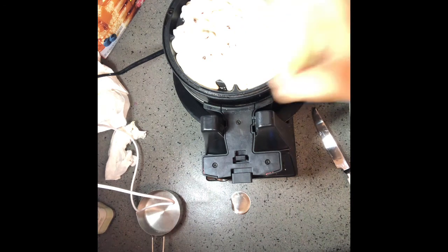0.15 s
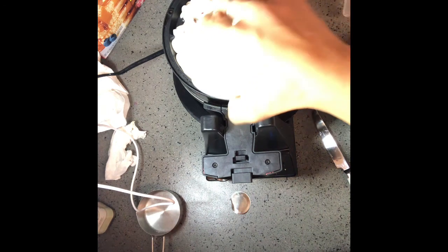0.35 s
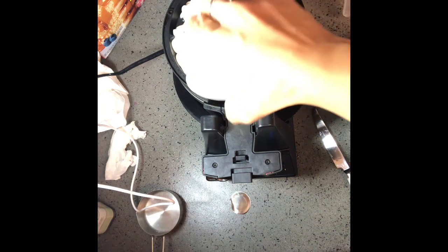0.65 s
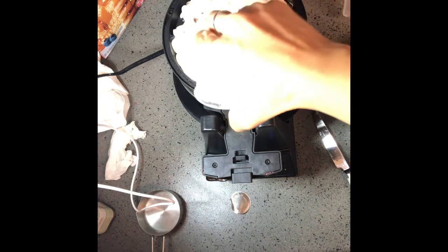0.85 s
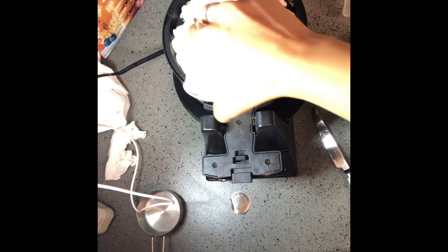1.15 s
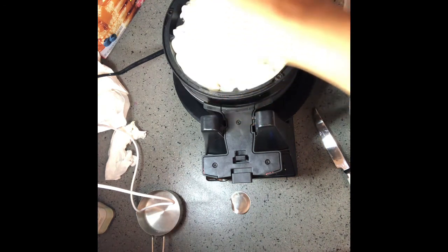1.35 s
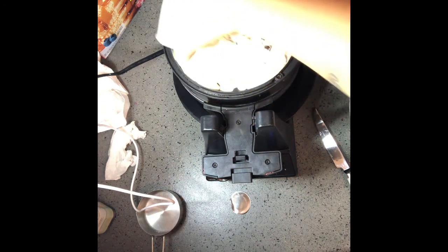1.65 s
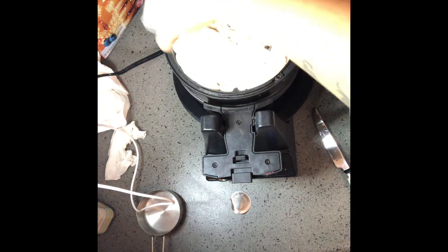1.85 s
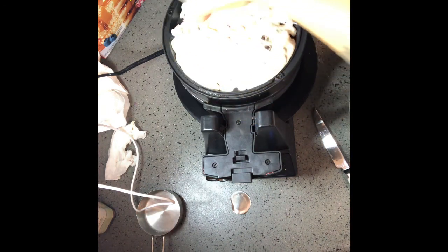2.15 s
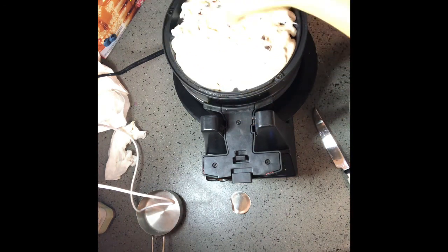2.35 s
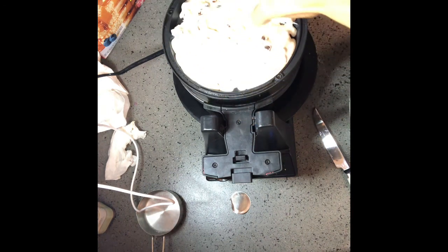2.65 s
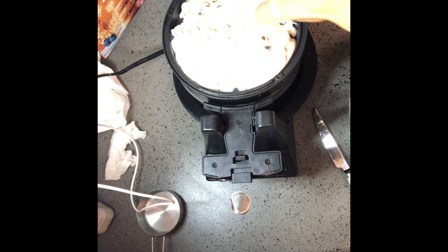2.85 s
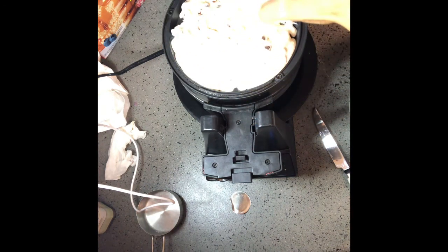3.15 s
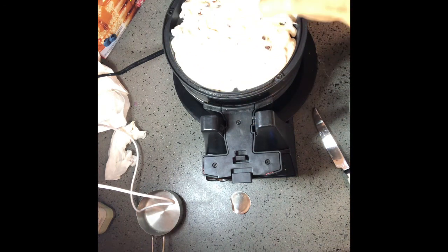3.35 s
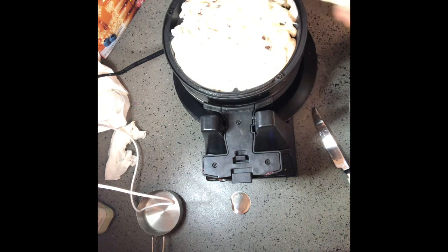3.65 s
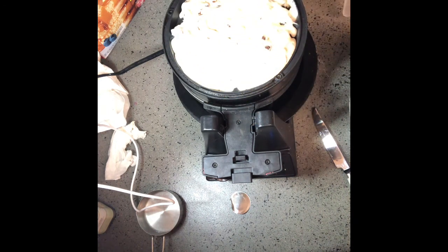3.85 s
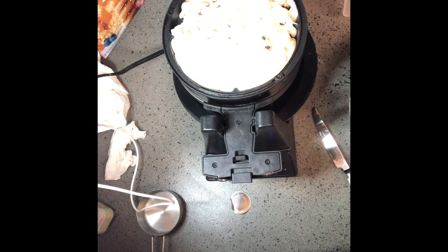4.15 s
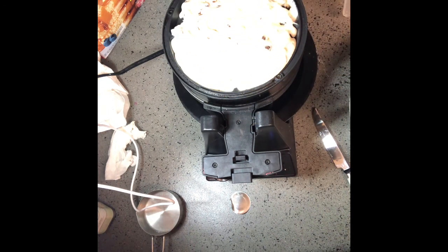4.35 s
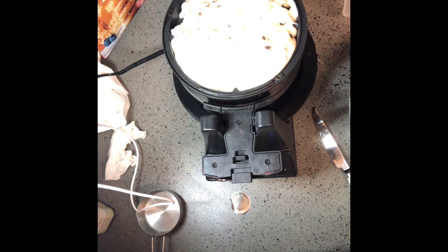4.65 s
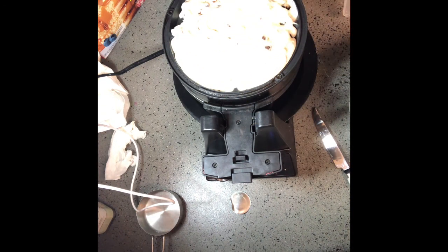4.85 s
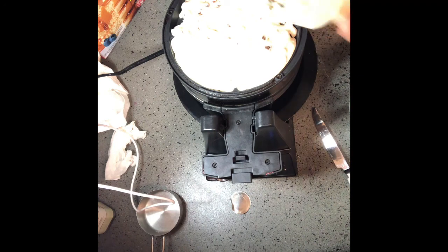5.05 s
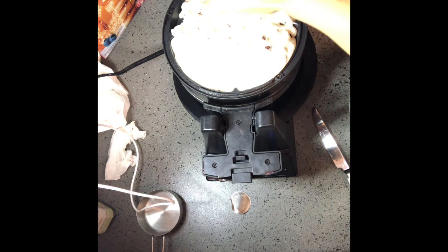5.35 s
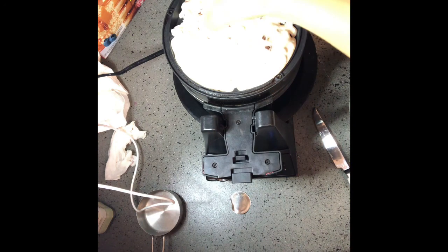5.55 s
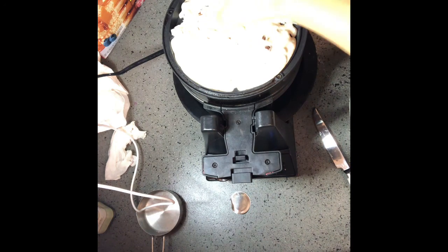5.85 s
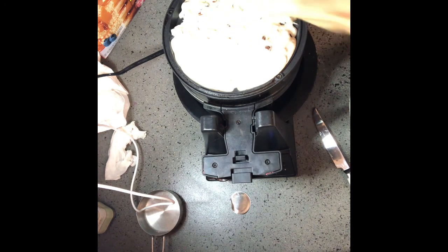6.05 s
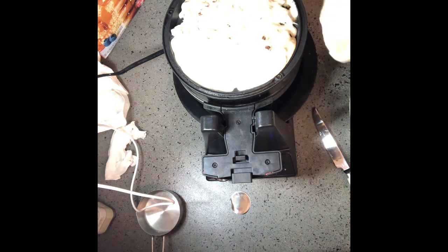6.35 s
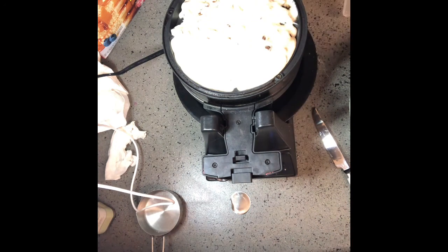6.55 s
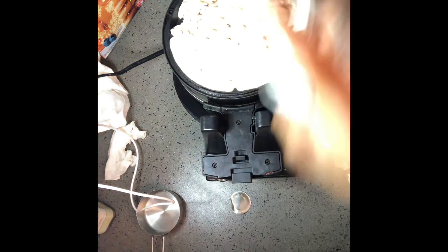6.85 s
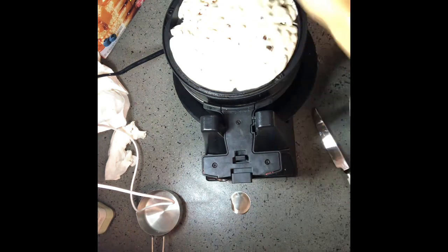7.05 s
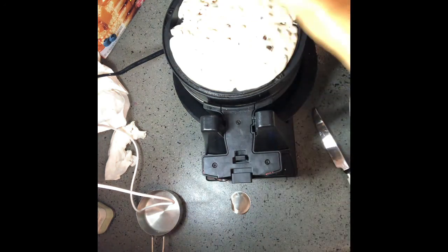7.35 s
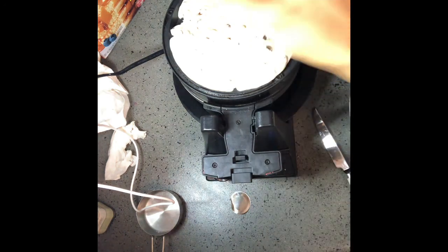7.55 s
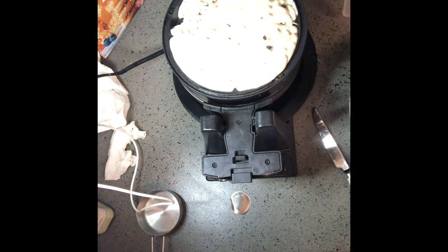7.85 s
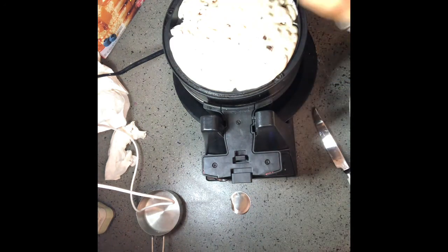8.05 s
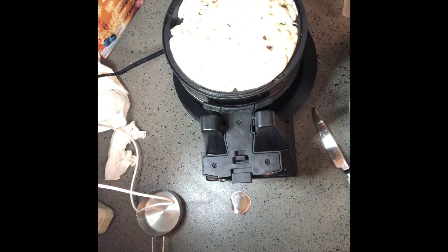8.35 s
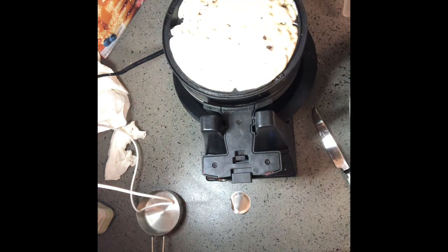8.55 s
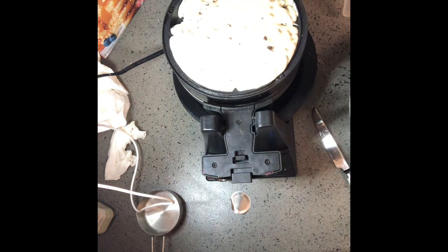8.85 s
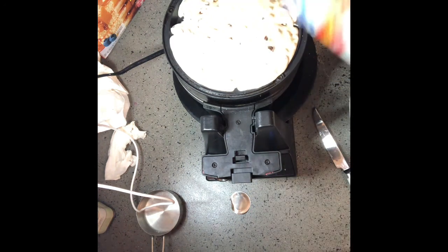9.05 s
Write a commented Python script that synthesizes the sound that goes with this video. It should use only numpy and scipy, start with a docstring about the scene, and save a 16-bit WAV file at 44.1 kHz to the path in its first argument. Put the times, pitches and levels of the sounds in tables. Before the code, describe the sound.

A faint steady sizzle and low room hum lie under close, dry kitchen handling. Light ticks, brushes and bumps of a heavy iron lead to six evenly spaced rim knocks, by far the loudest sounds. Short squeaks and a clack follow, then soft brushing, fat pops and a sharp fluttering spray. The can lands with a small knock, wobbles and scrapes along the counter.

```python
"""A cook works at a filled waffle maker on a kitchen counter, close to the microphone, over sizzle and hum.
Pressing the filling rocks the iron amid light taps and brushing; then six knocks land on its rim.
Short squeaking drags and a clack on a tin follow; a can is picked up, sprays for about a second, is set
down and is pushed along the counter. Struck things are resonant bodies excited by contact spectra;
rubbed ones are shaken by random slips; spray, brushing and sizzle are shaped noise."""
import sys
import numpy as np
from scipy import signal
from scipy.fft import rfft, irfft, next_fast_len
from scipy.io import wavfile
from scipy.ndimage import map_coordinates

SR = 44100
rng = np.random.default_rng(int(sys.argv[2]) if len(sys.argv) > 2 else 0)


def to_wav(s):
    """Save 16-bit WAV."""
    ch = np.atleast_2d(s).T  # columns
    pcm = np.round(np.clip(ch, -1, 1) * 32767)  # PCM
    wavfile.write(sys.argv[1], SR, pcm.astype(np.int16))


N = 405719
TIME = np.arange(N) / SR
HIT_SIZE = 8192  # samples in the spectrum of one blow
HIT_HZ = np.fft.rfftfreq(HIT_SIZE, 1 / SR)


def undb(db):
    """Logarithmic level: decibels to amplitude gain."""
    return 10 ** (np.asarray(db) / 20)


def unit(x):
    """Mean power: scale to rms 1."""
    return x / np.sqrt(np.mean(x ** 2))


def add(out, s, x):
    """Superposition: mix x into out, starting at s seconds."""
    start = max(int(s * SR), 0)
    out[start:start + len(x)] += x[:N - start]


def contour(hz, points):
    """Spectral envelope: gain at each frequency from (frequency [Hz], level [dB]) points."""
    at, db = np.transpose(points)
    return undb(np.interp(np.log(hz + 1), np.log(at), db))


def coloured(x, points):
    """Linear filtering: x shaped by a spectral envelope, at rms 1."""
    size = next_fast_len(N)
    gain = contour(np.fft.rfftfreq(size, 1 / SR), points)
    return unit(irfft(rfft(x, size) * gain, size)[:N])


def resonances(peaks):
    """Resonance: the summed power of steep-sided modes gives the gain of a body."""
    power = sum(undb(db) ** 2 / (1 + (2 * (HIT_HZ - hz) / width) ** 2) ** 3 for hz, width, db in peaks)
    return np.sqrt(power + 1e-9)


def causal(gain):
    """Minimum phase: the spectrum of the promptest impulse response that has this gain."""
    cepstrum = irfft(np.log(gain))
    cepstrum[1:HIT_SIZE // 2] *= 2
    cepstrum[HIT_SIZE // 2 + 1:] = 0
    return np.exp(rfft(cepstrum))


def walk(rate):
    """Random modulation: normal draws, rate a second, joined by straight lines."""
    steps = rng.standard_normal(N // 100)
    return np.interp(TIME * rate, np.arange(len(steps)), steps)


def grains(rate, spread_db):
    """Shot noise: random clicks of uneven size and sign, rate a second, at rms 1."""
    sizes = undb(spread_db * np.minimum(rng.exponential(size=N), 3))
    return unit((rng.random(N) < rate / SR) * sizes * rng.choice([-1, 1], N))


def gate(start, end, attack_s, release_s):
    """Amplitude envelope: straight attack, hold until end, exponential release."""
    return np.clip((TIME - start) / attack_s, 0, 1) * np.exp(-np.maximum(TIME - end, 0) / release_s)


def strokes(rows, release_s, lag_s=0):
    """Amplitude envelope of a few movements that build, hold and let go."""
    return sum(undb(db) * gate(start + lag_s, end + lag_s, build_s, release_s)
               for start, end, build_s, db in rows)


def blows(events, peaks, travel_s, chatter_s, gain_db, weight_db, hardness_db):
    """Impact excitation: a heavy blow brings out a body's bass, a hard one its treble."""
    out = np.zeros(N)
    # bending waves travel as the root of frequency, so the treble arrives first; travel_s holds near 1 kHz
    bending = np.exp(-4j * np.pi * travel_s * np.sqrt(1000 * (HIT_HZ + 50)))
    treble = 1 / (1 + (1700 / (HIT_HZ + 1)) ** 6)
    middle = (HIT_HZ > 500) & (HIT_HZ < 1500)
    for s, peak_db, thud_db, edge_db, *_ in events:
        # each blow lands on another spot and weights the resonances a little differently
        body = resonances([(hz, width, db + rng.standard_normal()) for hz, width, db in peaks])
        bands = [(80, 450), (500, 1500), (2000, 7000)]
        low, mid, high = (10 * np.log10(np.sum(body[(HIT_HZ > a) & (HIT_HZ < b)] ** 2)) for a, b in bands)
        bass_db = thud_db + weight_db + mid - low
        treble_db = edge_db + hardness_db + mid - high
        contact = contour(HIT_HZ, [(400, bass_db), (560, 0.11), (1500, 0.83), (2400, treble_db)])
        # rough surfaces chatter for a moment as they meet, which smears the treble
        chatter = rng.standard_normal(HIT_SIZE) * np.exp(-TIME[:HIT_SIZE] / chatter_s)
        smear = 1 - treble + treble * rfft(chatter) / np.linalg.norm(chatter)
        spectrum = causal(body * contact) * bending * smear
        mid_peak = np.abs(irfft(spectrum * middle)).max()
        add(out, s, irfft(spectrum)[:HIT_SIZE // 2] * undb(peak_db + gain_db) / mid_peak)
    return out


def friction(effort, peaks, slip_rate, spread_db, patchy_db):
    """Frictional excitation: uneven slips shake a resonant body."""
    body = irfft(causal(resonances(peaks)))
    slips = grains(slip_rate, spread_db) * undb(patchy_db * walk(45))
    return unit(signal.fftconvolve(slips, body)[:N]) * effort


# room noise of the kitchen: (frequency [Hz], relative level per Hz [dB])
AIR_COLOUR = [(15, -61.5), (25, -38), (64, -3.5), (124, -6.5), (182, -9.5), (243, -7), (371, -11),
              (409, -10.5), (612, -12.5), (662, -12), (2500, -30), (3250, -48.5), (5500, -120)]
# low steady hum of the kitchen: (frequency [Hz], rms level before wavering [dB])
HUM = [(79, -80), (120, -75.5), (240, -82)]


def kitchen():
    """Stationary noise: low room noise and a hum of sines wavering in level and phase."""
    hum = np.zeros(N)
    for hz, db in HUM:
        level = undb(db + 1.5 * walk(3)) * np.sqrt(2)
        hum += level * np.sin(2 * np.pi * hz * TIME + .5 * walk(3.707))
    return hum + coloured(rng.standard_normal(N), AIR_COLOUR) * undb(-68.94 + 0.61 * walk(3.6))


# bands of the room's echo: (centre frequency [Hz], level [dB], time to fade by 60 dB [s])
ECHO_BANDS = [(127.8, -3, 0.73), (352.2, -1.5, 0.18), (717, -14, 0.26), (1206.5, -12, 0.3),
              (2500, -13.5, 0.14), (5506, -12, 0.36), (14120, -9, 0.14)]


def room(x, first_echo_s):
    """Reverberation: dense echoes from counter and walls, each band fading at its own pace."""
    t = TIME[:SR]
    hz, noise, tail = np.fft.rfftfreq(SR, 1 / SR), rfft(rng.standard_normal(SR)), 0
    centres = np.log(np.array(ECHO_BANDS)[:, 0])
    for share, (_, db, t60) in zip(np.eye(len(ECHO_BANDS)), ECHO_BANDS):
        band = irfft(noise * np.interp(np.log(hz + 1), centres, share), SR)
        fade = undb(-60 * t / t60) * np.clip(t / first_echo_s - 1, 0, 1)
        tail = tail + undb(db) * band * fade / np.sqrt(np.sum(fade ** 2))
    return signal.fftconvolve(x, tail)[:N]


# harder sizzling about the pressing, knocks and spray:
# (start [s], time to build [s], time constant of dying down [s], level [dB])
FLARES = [(0, 1.274, 1.1, -76), (2.4, .4, .3, -65.5), (7.2, .8, 0.7, -60.5)]


def sizzle_level():
    """Amplitude envelope: a steady simmer, with flares that build and die down."""
    flares = sum(undb(db) * gate(s, s + build_s, build_s, fade_s) for s, build_s, fade_s, db in FLARES)
    return undb(-73.5) + flares


# spectra of the hiss and of the crackle: (frequency [Hz], relative level per Hz [dB])
HISS_COLOUR = [(710, -29.5), (1200, -1.5), (1510, -8.5), (2200, -4.5), (4770, -5), (7270, -6.5),
               (8730, -11.5), (15100, -11), (15800, -13.5)]
CRACKLE_COLOUR = [(1000, -22), (3500, -0.5), (7500, -1), (15000, -4)]


def sizzle():
    """Bubble noise: tiny steam bubbles burst in a smooth hiss; larger ones crackle singly."""
    hiss = coloured(rng.standard_normal(N), HISS_COLOUR) * undb(0.606 * walk(9.1))
    burst = rng.standard_normal(HIT_SIZE) * np.exp(-TIME[:HIT_SIZE] / .0015)
    crackle = coloured(signal.fftconvolve(grains(45, 3.49), burst)[:N], CRACKLE_COLOUR)
    return (undb(-1.5) * hiss + undb(-7.5) * crackle) * sizzle_level()


# single pops of hot fat: (time [s], level before a common 12 dB cut [dB])
FAT_POPS = [(3.692, -39.5), (4.713, -44.5), (6.94, -33), (7.132, -39.5), (8.237, -35), (8.645, -45)]


def pops():
    """Impulsive noise: fat droplets burst as decaying noise, differenced to sound thin and bright."""
    out = np.zeros(N)
    for s, db in FAT_POPS:
        snap = np.diff(rng.standard_normal(HIT_SIZE + 1)) * np.exp(-TIME[:HIT_SIZE] / 0.0025)
        add(out, s, undb(db - 12.0) * snap)
    return out


# hands brush the filling, the iron and the can:
# (time of peak [s], time constant of swell and fade [s], level [dB])
RUBS = [(.1, 0.039, -65.5), (0.287, .0087, -54.5), (1.201, 0.02, -60), (1.52, 0.039, -65.5),
        (1.96, 0.11, -69), (5.03, 0.12, -70), (6.497, 0.035, -50.5), (6.916, 0.029, -53.5)]
# spectrum of the swishes: (frequency [Hz], relative level per Hz [dB])
BRUSH_COLOUR = [(290, -33), (500, -11), (841, -17.5), (1610, -3.5), (1920, -13.5), (2630, -6), (8990, -18),
                (12400, -24.5), (15800, -29)]


def brush():
    """Sliding-contact noise: skin and utensil pass over things in soft, grainy swishes."""
    # the utensil scuffs the rim 42 ms after the second, third and fourth knocks
    scuffs = [(s + .042, 0.017, -55) for s, *_ in RIM_KNOCKS[1:4]]
    pressure = sum(undb(db) * np.exp(-np.abs(TIME - s) / length) for s, length, db in RUBS + scuffs)
    swish = coloured(rng.standard_normal(N) + 0.92 * grains(700, 2.4), BRUSH_COLOUR)
    return swish * pressure * undb(-0.5 + 2.2 * walk(70))


def rebounds(events, count, rebound_s=.013, rebound_db=-6.5):
    """Energy loss at impact: each tap repeats at uneven gaps, weaker each time."""
    rows = []
    for s, peak_db, thud_db, edge_db in events:
        for k, spread in enumerate(rng.uniform(.5, 1.5, count)):
            rows.append((s, peak_db + k * rebound_db, thud_db, edge_db))
            s = s + rebound_s * spread
    return rows


# In every table of blows: level is the mid-band peak before gain_db; thud and edge are relative to the
# mid band, before weight_db and hardness_db.
# light taps of fingers and utensil: (time [s], level [dB], thud [dB], edge [dB])
LIGHT_TAPS = [(.266, -46, -10, -32), (.413, -37, -20, -16), (.565, -50, -19.5, -12),
              (1.004, -37.5, -16, -13), (1.173, -42.5, -8, -7), (1.485, -49.5, -5.5, -8),
              (1.631, -42, -24.5, -8.5), (1.649, -47.5, -7, -30), (1.789, -47, -9, -17),
              (6.48, -45.5, -11, -3.5), (6.819, -50.5, -27, 4), (7.123, -60, -26, 13.5),
              (7.85, -29, -16, 7), (7.88, -37, -22, -17)]
# resonances of the utensil: (frequency [Hz], width [Hz], level [dB])
UTENSIL = [(356, 170, -25), (845, 130, -9), (1106, 150, 5.5), (1570, 87, 6), (2210, 960, 8.5),
           (3560, 5200, 5), (6200, 4500, -3.5), (12100, 4300, -7.5)]


def taps():
    """Repeated impact: light taps on the utensil's resonances bounce in quick succession."""
    return blows(rebounds(LIGHT_TAPS, count=3), UTENSIL, travel_s=0.00119, chatter_s=0.0082,
                 gain_db=0.66, weight_db=2.5, hardness_db=1.7)


# squeaking drags: (start [s], end [s], time to build [s], level [dB])
DRAGS = [(4.31, 4.36, .05, -58.5), (4.47, 4.515, 0.023, -46)]
# resonances of the dragged thing: (frequency [Hz], width [Hz], level [dB])
SQUEAK = [(260, 470, -11.5), (740, 180, 4.5), (1314, 210, 4), (2010, 2100, -19.5), (2830, 180, -14),
          (4100, 4700, -19.5), (8800, 8000, -35)]


def drag():
    """Stick-slip friction: short scrapes and, late and weaker, a thin squeal that rings out."""
    squeal_hz = 2800 * (1 + 0.011 * walk(300))
    squeal = np.sin(2 * np.pi * np.cumsum(squeal_hz) / SR) * np.sqrt(2)
    scrape = friction(strokes(DRAGS, 0.0093), SQUEAK, slip_rate=400, spread_db=2.0, patchy_db=1.0)
    return scrape + squeal * undb(-11) * strokes(DRAGS, release_s=0.014, lag_s=.014)


# a hard clack on a tin: (time [s], level [dB], thud [dB], edge [dB])
TIN_CLACK = [(5.154, -38.5, -10, -5)]
# resonances of the tin: (frequency [Hz], width [Hz], level [dB])
TIN = [(370, 370, 0.5), (780, 78, -5.5), (1320, 87, -3.5), (1645, 67, 11.5), (2130, 840, 5),
       (3240, 770, -16), (6500, 4000, -29)]


def clack():
    """Hard impact: brief contact excites the resonances of a tin."""
    return blows(TIN_CLACK, TIN, travel_s=0.00117, chatter_s=0.0035,
                 gain_db=-1.3, weight_db=0.5, hardness_db=-1.0)


# the can meets the counter and judders along it: (time [s], level [dB], thud [dB], edge [dB])
COUNTER_THUDS = [(8.533, -54, 11, -29), (8.592, -42.5, 0, -14), (8.6, -31, -13.5, -8.5),
                 (8.606, -36, -12, -9), (8.74, -48, -1.5, -15), (9.09, -51, 5, -36), (9.112, -53, 8.5, -35),
                 (9.146, -49, 0, -35)]
# resonances of the counter: (frequency [Hz], width [Hz], level [dB])
COUNTER = [(135.5, 110, 2), (253, 280, 0.5), (400, 130, 2.5), (550, 170, 2), (830, 940, -10),
           (1600, 230, -2.5), (1970, 2500, -15), (3700, 5200, -22.5)]


def thuds():
    """Impact on a panel: the can excites the broad low resonances of the counter."""
    return blows(COUNTER_THUDS, COUNTER, travel_s=0.001746, chatter_s=0.0036,
                 gain_db=1.7, weight_db=5.0, hardness_db=3.0)


# the can wobbles to rest: (time [s], level [dB], thud [dB], edge [dB])
CAN_WOBBLES = [(8.644, -34, -32, -18), (8.675, -43.5, -28, -15), (8.716, -48, -24, -28)]
# resonances of the can: (frequency [Hz], width [Hz], level [dB])
CAN = [(566, 140, -8), (1390, 194, 1), (1640, 200, -12), (3130, 5900, -24.5), (7500, 8200, -29)]


def wobbles():
    """Rocking impacts: the can's own resonances sound in three weakening blows."""
    return blows(CAN_WOBBLES, CAN, travel_s=0.00108, chatter_s=0.0097,
                 gain_db=3.0, weight_db=-11, hardness_db=3.5)


# the can is pushed over the counter: (start [s], end [s], time to build [s], level [dB])
PUSHES = [(8.526, 8.555, .012, -59), (8.585, 8.63, 0.019, -46), (8.64, 9.12, 0.069, -60),
          (8.88, 9.115, 0.094, -58.5)]


def slide():
    """Sliding friction: the pushed can shakes the counter and coasts to a stop."""
    return friction(strokes(PUSHES, release_s=0.037), COUNTER, slip_rate=800, spread_db=1, patchy_db=2.5)


# sweeps with the jet straight at the iron: (start [s], end [s], time to swing in [s], level [dB])
SWEEPS = [(7.15, 7.292, 0.017, -29), (7.436, 7.788, 0.012, -28.5), (7.915, 7.991, 0.037, -31)]
# spectra of the jet and of the air it drags along: (frequency [Hz], relative level per Hz [dB])
JET_COLOUR = [(900, -31), (2000, -14.5), (2800, -9.5), (3600, 0.5), (4500, 2), (5400, -3.5), (7500, 1),
              (8400, -5), (9800, -4.5), (11000, -1), (12200, -1), (15500, -1.5)]
RUSH_COLOUR = [(47, -33), (80, -7), (231, -5.5), (308, -9), (732, -8), (1070, -1), (1760, -6.5), (1900, -5),
               (3000, 2), (3900, -36), (6600, -120)]


def spray():
    """Turbulence noise: a fluttering jet full of droplets, over the duller rush of entrained air."""
    valve = gate(7.144, 8.008, attack_s=0.0023, release_s=0.006)
    flow = valve * (undb(-35) + strokes(SWEEPS, release_s=0.015))  # -35 dB while turned aside
    jet = coloured(rng.standard_normal(N) + 0.38 * grains(3000, 5.6), JET_COLOUR)
    # the iron reflects the hiss; as the can moves the notches of this echo wander
    lag_s = .0013 + .00016 * walk(6)
    echo = map_coordinates(jet, [(TIME - lag_s) * SR], order=3)
    jet = unit(jet + undb(-10.5) * echo)
    # the rush holds up while the jet is turned aside
    rush = coloured(rng.standard_normal(N), RUSH_COLOUR) * np.tanh(flow / undb(-34))
    flutter = undb(1.64 * walk(70))
    return flutter * (jet * flow + undb(-43) * rush)


# the iron rocks on its feet:
# (time [s], level [dB], thud [dB], edge [dB], ring level [dB], ring tilt [dB per octave])
ROCKING = [(.437, -42.5, -2, -15.5, -62, 10), (.718, -28, -11, -23, -52, 11),
           (1.029, -23.5, -14.5, -18.5, -45, 3), (2.258, -55.5, -4, -20, -74, 0),
           (3.983, -47, -11.5, -38, -81, 0), (4.343, -48, -14, -23, -77, 0),
           (4.443, -42.5, -18.5, -22, -69, 0), (5.282, -28.5, -18.5, -30, -63, 23)]
# resonances of the housing: (frequency [Hz], width [Hz], level [dB])
HOUSING = [(133, 31, 5), (238, 190, -1.5), (393.5, 178, 3.5), (551, 220, -2.5), (718, 72, 1.5),
           (924, 190, 1), (1049, 230, -1.5), (1275, 103, -4), (1700, 710, -8), (2180, 1600, -14),
           (3720, 870, -11), (4750, 3000, -26.5), (9700, 7000, -35.5)]


def bumps():
    """Structural impact: the rocking iron excites the resonances of its housing."""
    return blows(ROCKING, HOUSING, travel_s=0.0025, chatter_s=0.0044,
                 gain_db=1.5, weight_db=11.0, hardness_db=7.0)


# resonances of the iron on its feet: (frequency [Hz], width [Hz], level [dB])
FEET = [(85, 40, -4.5), (153, 52, 1), (278, 130, -11)]


def settle(events, lag_s, gain_db):
    """Mass on springs: after each blow the iron drops back on its feet with a soft thump."""
    out, thump = np.zeros(N), irfft(causal(resonances(FEET)))
    for s, peak_db, thud_db, *_ in events:
        add(out, s + lag_s, thump / np.abs(thump).max() * undb(peak_db + thud_db + gain_db))
    return out


# lasting modes of the iron: (frequency [Hz], relative level [dB], time to fade by 60 dB [s])
PLATE_MODES = [(99.3, -7, 0.33), (397, 0.5, 0.64), (468, -8.5, 0.45), (611.8, -10.5, 0.92), (647, -6, 0.38),
               (1127, -17, 0.2)]


def plate():
    """Modal decay: the iron's low modes ring on until the next knock or bump stills them."""
    out, t = np.zeros(N), TIME[:SR]
    for s, *_, ring_db, tilt_db in sorted(RIM_KNOCKS + ROCKING):
        ring = np.zeros(SR)
        for hz, db, t60 in PLATE_MODES:
            tilted_db = db + tilt_db * np.clip(np.log2(hz / 400), 0, 1)  # tilt acts from 400 to 800 Hz
            ring += undb(tilted_db - 60 * t / t60) * np.sin(2 * np.pi * hz * t)
        start = int(s * SR)
        out[start:] *= np.exp(-TIME[:N - start] / .01)
        add(out, s, ring * (1 - np.exp(-t / .006)) * undb(ring_db))
    return out


# knocks on the rim:
# (time [s], level [dB], thud [dB], edge [dB], ring level [dB], ring tilt [dB per octave])
RIM_KNOCKS = [(2.381, -29, -11.5, -25.5, -55.5, 6), (2.539, -18, -35.5, -19.5, -60, 9),
              (2.668, -13, -26.5, -21, -55.5, 4), (2.822, -5.5, -33.5, -21.5, -50.5, 4),
              (2.963, -6, -32.5, -24, -47, 1), (3.118, -10.5, -26.5, -22, -43, -11)]
# resonances of the rim: (frequency [Hz], width [Hz], level [dB])
RIM = [(294.7, 318, -33), (614, 170, -8), (716.5, 133, -0.5), (969, 295, -5.5), (1086, 246, -3),
       (1511, 510, -15), (1950, 171, -19), (2580, 1300, -25), (3630, 1600, -29.5), (5120, 2100, -33.5),
       (7130, 1800, -42), (10800, 7150, -50.5)]


def knocks():
    """Impact on a rim: six blows excite its resonances, the treble arriving first."""
    return blows(RIM_KNOCKS, RIM, travel_s=.0021, chatter_s=0.0042,
                 gain_db=-1.13, weight_db=7, hardness_db=2.5)


def scene():
    """Superposition: all the handling in its room, over the sizzle and the kitchen's own noise."""
    can = thuds() + wobbles() + slide() + spray()
    near = knocks() + bumps() + taps() + clack() + can + pops() + drag() + brush()
    iron = plate() + settle(RIM_KNOCKS, lag_s=.021, gain_db=-1.5)
    iron = iron + settle(ROCKING, lag_s=0.0074, gain_db=-1.5)
    return (near + iron + room(near, first_echo_s=0.00292) + sizzle() + kitchen())[None]


def record(dry):
    """Low-pass filtering: a steep elliptic cut removes the treble above 15.9 kHz."""
    return signal.sosfilt(signal.ellip(10, .1, 70, 15900, fs=SR, output="sos"), dry)


dry = scene()
out = record(dry)
to_wav(out)
```